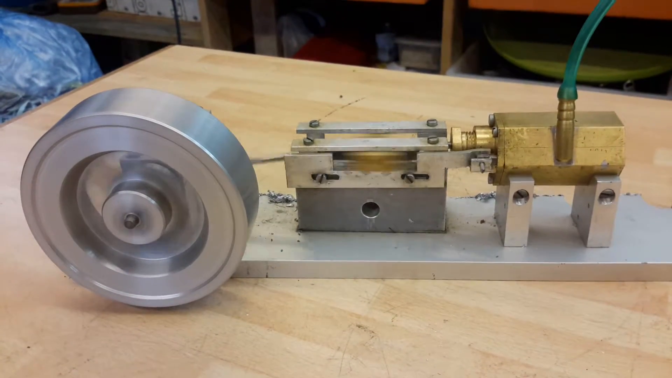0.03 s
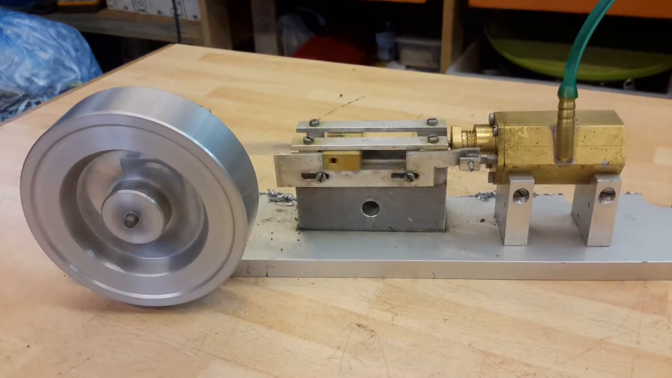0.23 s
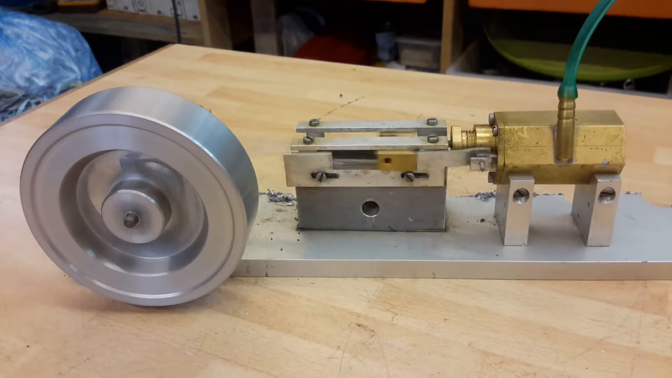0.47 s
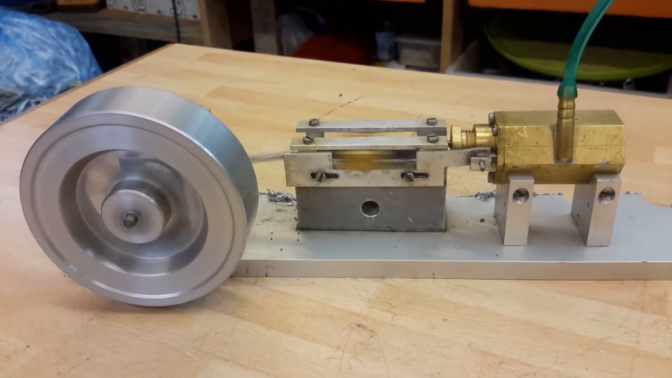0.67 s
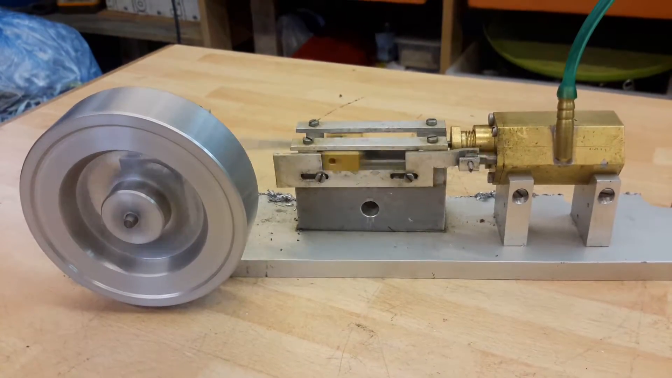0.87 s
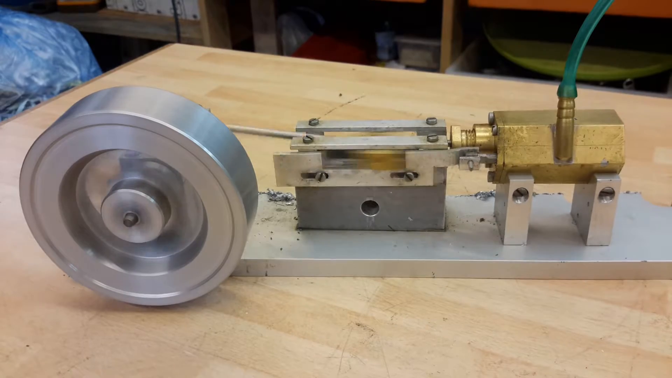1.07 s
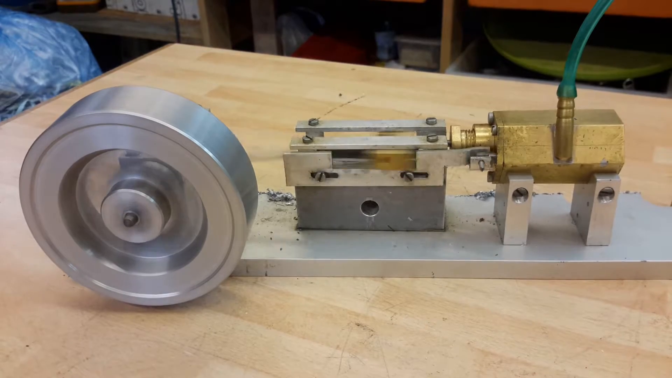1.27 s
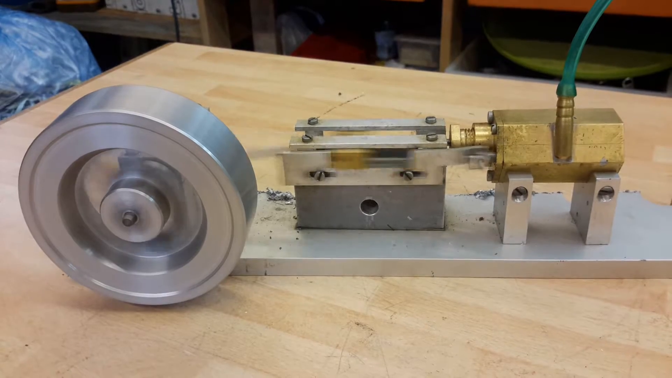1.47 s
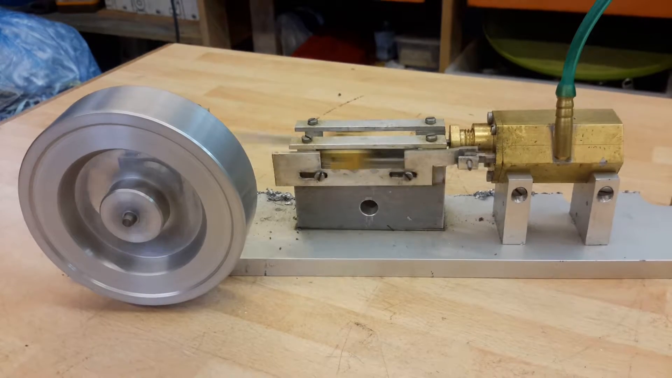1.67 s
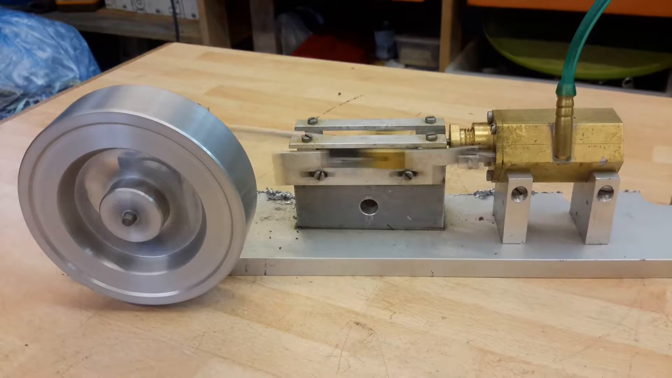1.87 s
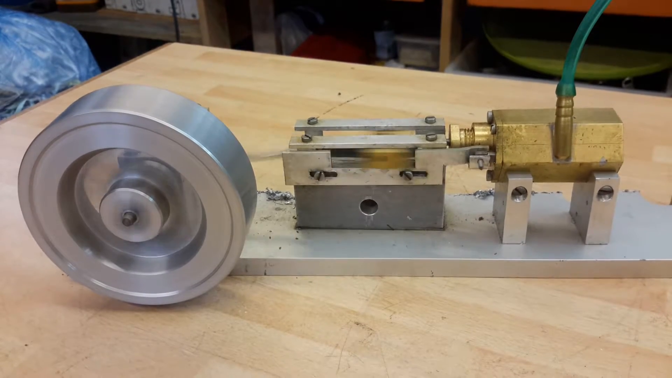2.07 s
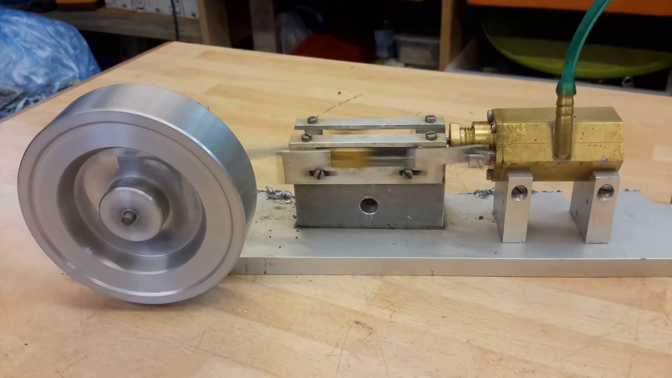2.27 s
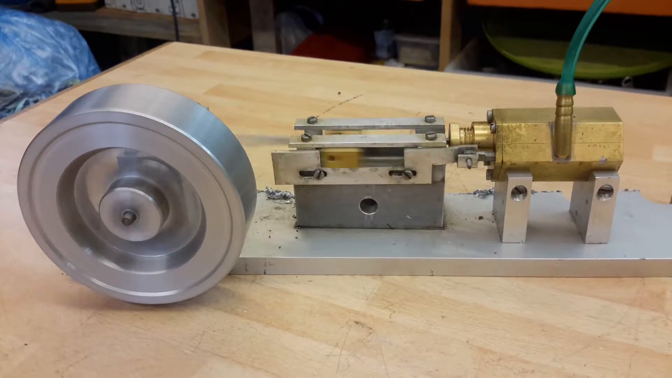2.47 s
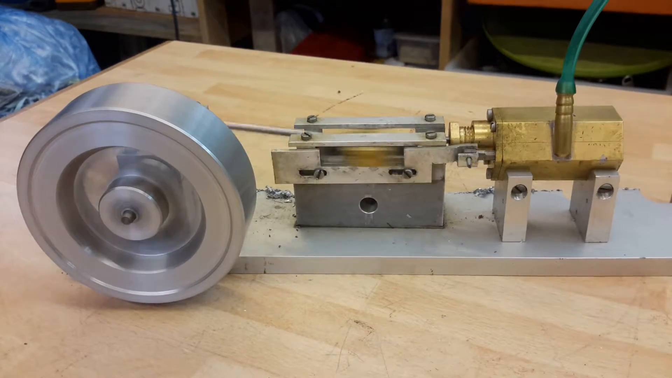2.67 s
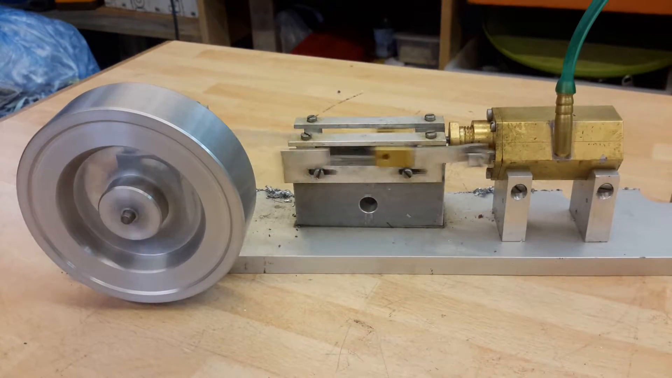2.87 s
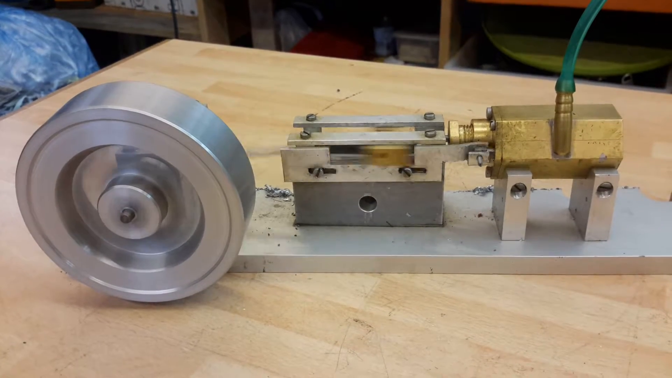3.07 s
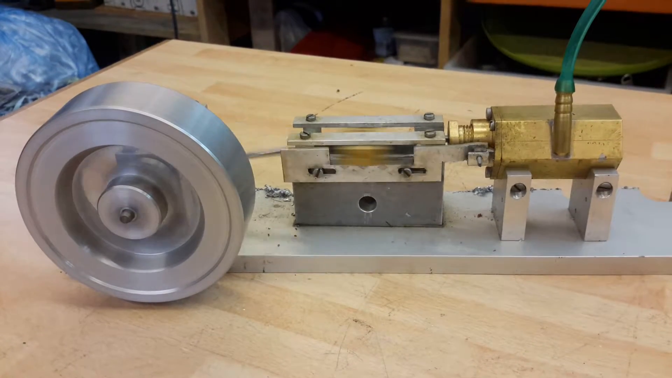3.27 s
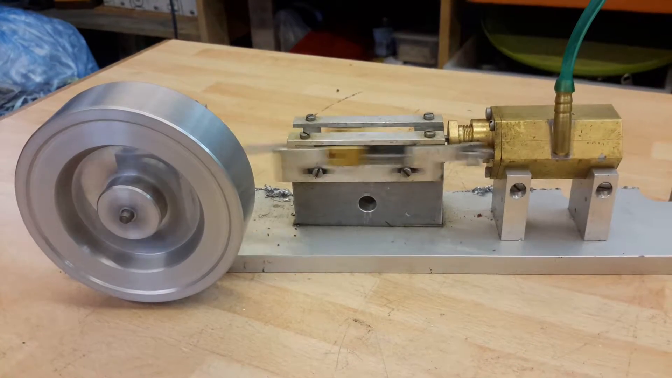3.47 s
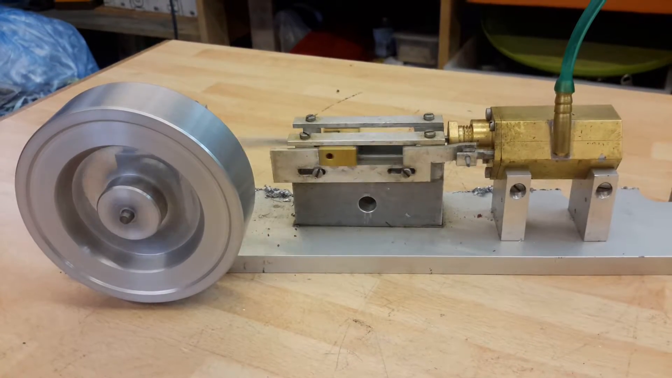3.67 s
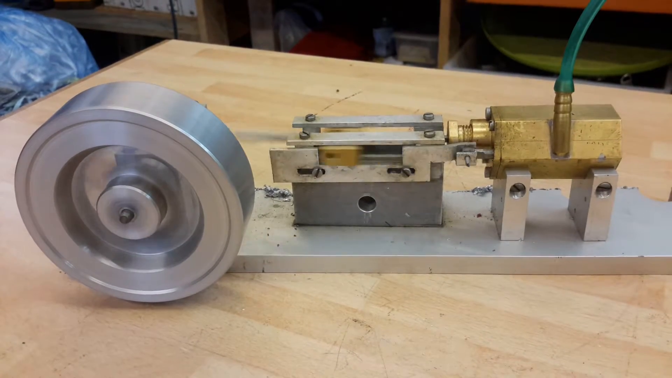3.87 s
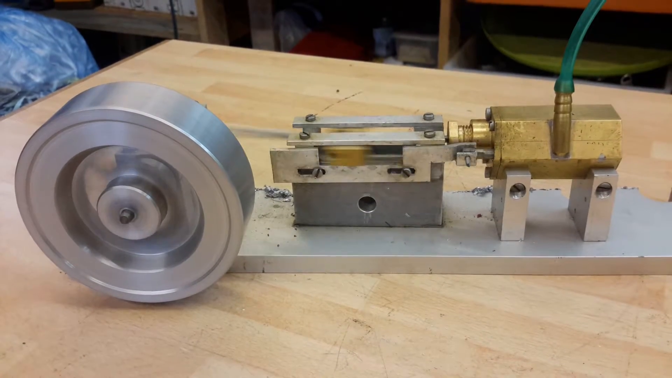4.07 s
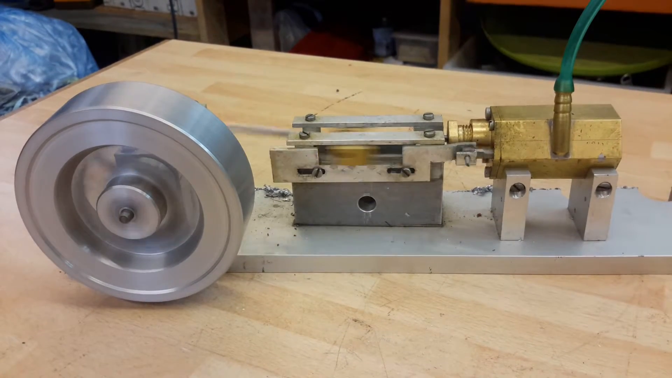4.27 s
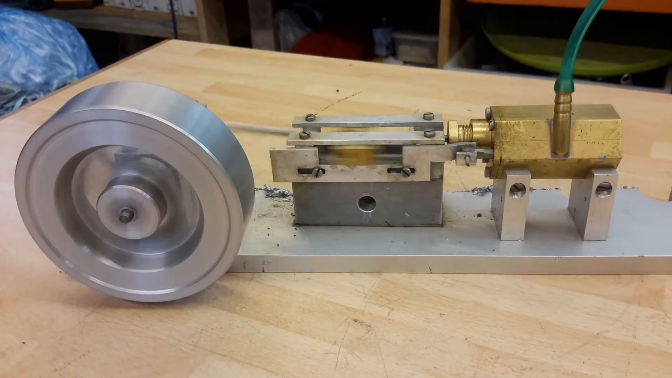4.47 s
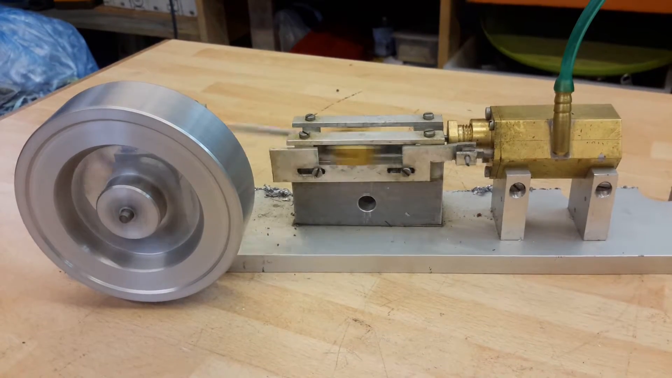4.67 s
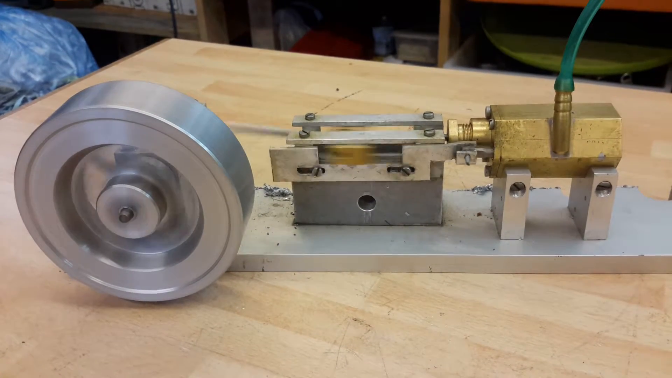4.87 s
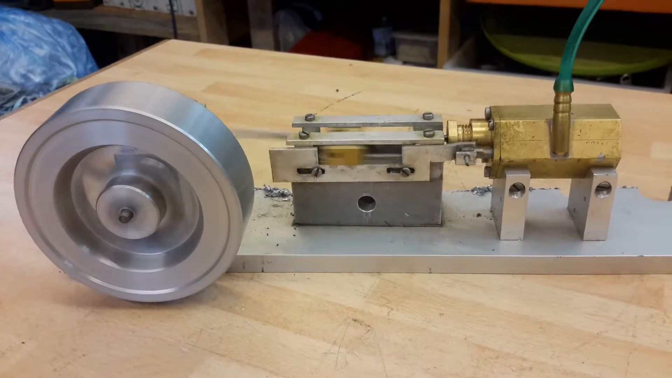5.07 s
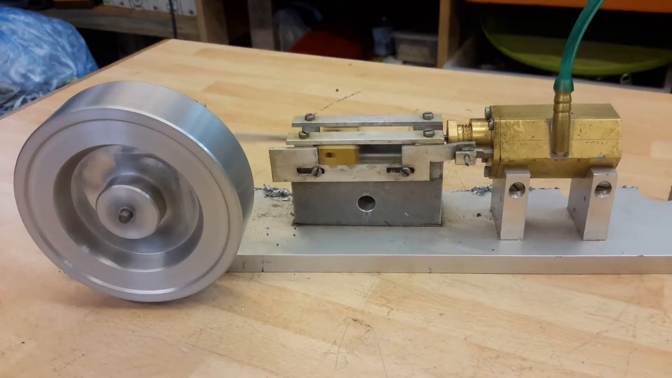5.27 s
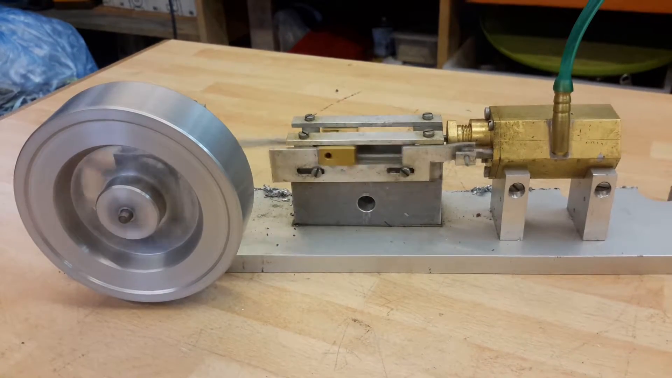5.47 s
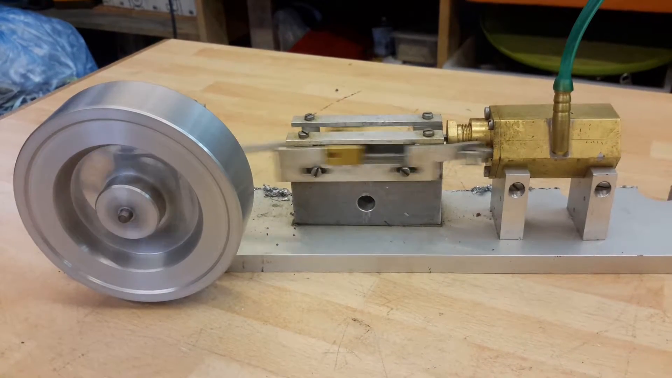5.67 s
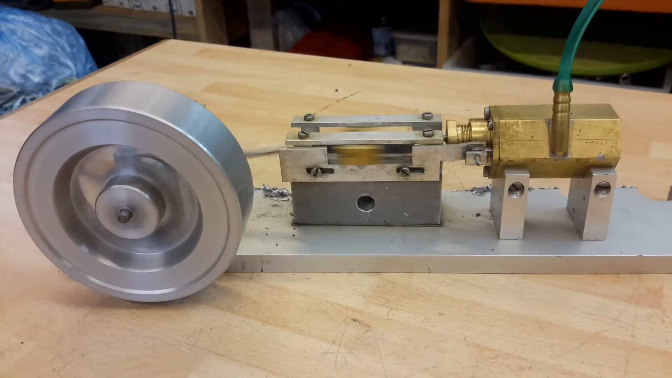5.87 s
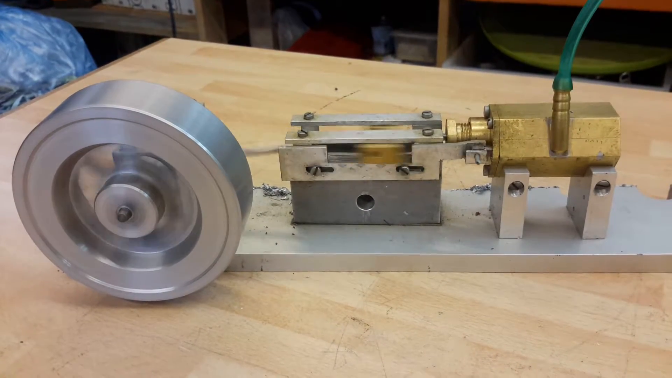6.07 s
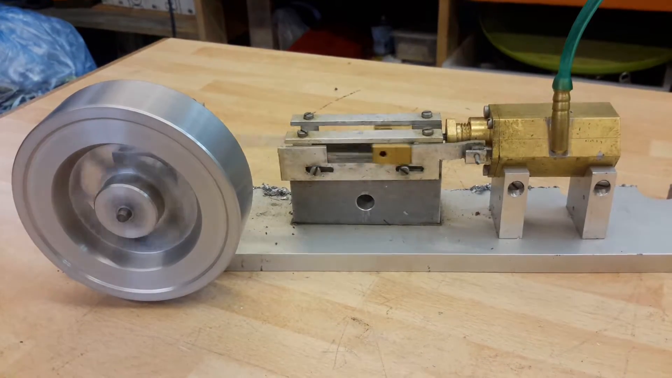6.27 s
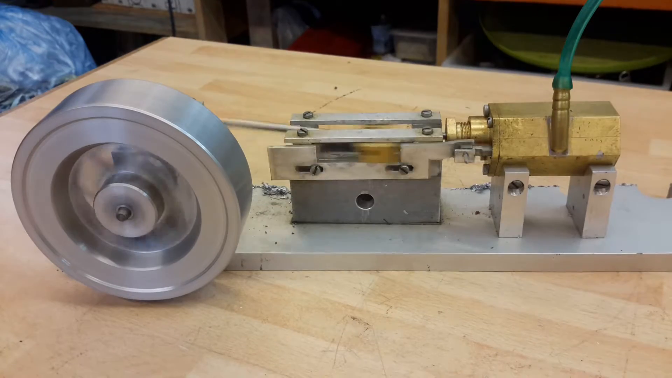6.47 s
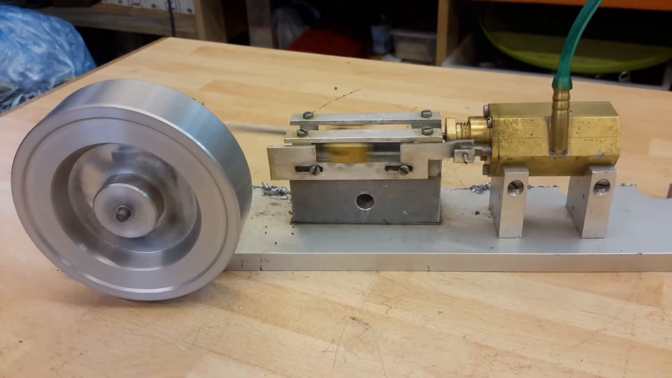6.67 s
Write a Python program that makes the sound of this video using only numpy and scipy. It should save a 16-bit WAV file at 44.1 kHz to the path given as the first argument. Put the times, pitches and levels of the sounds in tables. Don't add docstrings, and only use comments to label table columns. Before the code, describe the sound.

A small metal engine clatters rapidly on a wooden bench, bright double knocks with rattling rebounds over faint air hiss, steadily slowing and weakening.

```python
import sys
import numpy as np
from scipy import signal
from scipy.fft import rfft, irfft
from scipy.io import wavfile
from scipy.ndimage import uniform_filter1d

SR = 44100
rng = np.random.default_rng(int(sys.argv[2]) if len(sys.argv) > 2 else 0)


def gain_from_decibels(decibels):
    exponent = np.asarray(decibels, float) / 20
    return 10 ** exponent


def persist_wave(psi):
    counts = np.round(np.clip(psi, -1, 1) * 32767).astype(np.int16)
    wavfile.write(sys.argv[1], SR, np.atleast_2d(counts).T)


N = 296352

SKIP_S, SKIP_SAMPLES = 1.0912, 1024
LENGTH = N + SKIP_SAMPLES

# (time [s], level [dB])
PRESSURE = [
    (0, -1),
    (1.9, -0.77),
    (3.0, -1.9),
    (4.0, -2.5),
    (5.2, -3.5),
    (6.72, -5.5),
]
# (turn number [1], turn period [ms])
SPEED = [
    (0, 155.01),
    (6, 156.7),
    (12, 159.15),
    (18, 169.8),
    (24, 186.12),
    (30, 212.69),
    (36, 238.5),
]
# (time [s], frequency [Hz], level [dB])
HUM = [(0, 97.6, -51.5), (0.95, 100.4, -54.5), (1.65, 98.3, -53), (1.9, 93.4, -49.5), (3.2, 90.4, -53),
       (4.4, 89.1, -50.5), (6.72, 91.1, -59)]
# (time [s], level [dB], half length [s])
HUM_SWELLS = [(.6, -51.5, 0.087), (0.916, -46, .07), (1.263, -48.5, 0.089), (1.65, -51, 0.089),
              (1.99, -45, .08), (2.45, -56, 0.31), (3.552, -54, .25), (4.38, -60, 0.087)]
# (time [s], level [dB], half length [s])
RUMBLE_SWELLS = [
    (.92, -42, .09),
    (1.317, -39, 0.14),
    (1.652, -43, 0.24),
    (4.21, -53, 0.041),
]
# (frequency [Hz], density [dB per Hz])
LEAK_SPECTRUM = [(15, -77), (25, -26), (43, -56), (82, -16), (300, -6), (410, -8), (703, -15.5), (997, -25),
                 (1380, -18), (1710, -18.5), (2170, -20), (4500, -12), (9050, -31), (12800, -31.5),
                 (15500, -104)]
# (frequency [Hz], density [dB per Hz])
OUT_CLATTER = [(410, -24.5), (700, -6.5), (965, -22), (1360, -9.5), (1650, -11.5), (2520, -11),
               (2800, -17.5), (4730, 0), (6040, -13), (8210, -16.5), (12400, -37), (15000, -72)]
BACK_CLATTER = [(410, -37), (700, -1), (952, -7), (1650, -10.5), (1830, -1.5), (2400, -10.5), (2730, -6.5),
                (3300, -0.5), (4980, -2), (7040, -15), (9210, -25), (15000, -81)]
# (frequency [Hz], level [dB], decay time T60 [s])
FRAME_MODES = [(1430, -8.5, 0.057), (2322, -17.5, 0.16), (3040, -5.5, 0.015), (3870, -11, 0.051),
               (4210, -1.5, 0.011), (4250, -20, 0.033), (4530, 0.5, 0.013), (4710, -2.5, 0.024),
               (5050, -11, 0.048), (4990, -3.5, 0.076), (5310, -9.5, 0.089)]
# (frequency [Hz], level [dB], decay time T60 [s])
BOARD_MODES = [(249.4, -24, 0.14)]
# (frequency [Hz], level [dB], decay time T60 [s])
OUT_BENCH = [(165, -14.5, 0.067), (321, -1.5, 0.031), (412.6, 2.5, 0.06), (472, 0, 0.04),
             (528, -0.5, 0.044), (627, -0.5, 0.049), (629, -5.5, 0.11), (695, -10.5, 0.089)]
BACK_BENCH = [(161, -16.5, 0.088), (241, -10.5, 0.094), (350, -3.5, 0.036), (434.6, 4, 0.05),
              (493, -0.5, 0.033), (525.6, -1.5, 0.055), (650, -1.5, 0.044), (696, -7, 0.047)]
# (frequency [Hz], level [dB], decay time T60 [s])
PIN_MODES = [(1514, -7, 0.0072), (2670, -16, 0.0097), (5080, -0.5, 0.01), (6360, -10, 0.0026),
             (8200, -20, .005), (11160, -26, 0.0038), (12760, -22, 0.012), (14450, -24, 0.0034)]
# (frequency [Hz], level [dB], decay time T60 [s])
OUT_ROD = [(1445, 2, 0.026), (1680, 3, 0.0094), (2008, -2.5, 0.021), (2294, -7.5, 0.054),
           (2666, -6.5, 0.045)]
BACK_ROD = [(1454, 0, 0.0051), (1723, 1.5, 0.015), (1897, -8.5, 0.014)]
# (frequency [Hz], level [dB], decay time T60 [s])
OUT_BRASS = [(2866, -1.5, 0.0096), (3774, -8, 0.049), (4374, -2.5, 0.02), (4940, -1.5, 0.015),
             (6080, -2.5, 0.006), (7670, -17, 0.016), (8230, -11.5, 0.0035), (8950, -12, 0.0065)]
BACK_BRASS = [(2690, -5, 0.0022), (3136, -10.5, 0.043), (4056, -2, 0.013), (4510, -4, 0.013),
              (5060, -6, 0.014), (6130, -26, 0.0092), (7060, -19, 0.014), (8700, -13, 0.0043)]
# (time when fast [ms], time when slow [ms], level when fast [dB], level when slow [dB])
OUT_THUDS = [(0.503, 1, -0.5, -13), (6.93, 5.84, -8, -13), (14.8, 17.52, 2, 5), (22.27, 34, -7, -8.5),
             (29.5, 31, -6.5, 2), (36.31, 42, -3.5, -9), (49.44, 58, -4, -11)]
BACK_THUDS = [(4.85, 5.03, 6.5, -3), (10.28, 12.3, 5, 4.5), (16.22, 16.3, -8, -6), (20.7, 22, -0.5, 6),
              (30.02, 33, -3, -1), (35.5, 37, 2.5, -0.5), (46.35, 56, -19, -16), (56.7, 50, -25, -2.5)]
# (time when fast [ms], time when slow [ms], brass level [dB], rod level [dB], change when slow [dB])
OUT_BLOWS = [
    (0.095, 0.95, 1, -6, -6.5),
    (1.834, 2.47, -2.5, 4, -1),
    (7.01, 8.5, -13.5, -11.5, 5),
    (10.68, 11, -2.5, 4.5, -19),
    (12.325, 14.5, -7, -5, 4),
    (18, 19.5, -9.5, -34, -16),
    (22.5, 23.5, -24, -23, 20.5),
    (26.04, 29.5, -6, -25.5, -14),
    (35.3, 38, -21, -16, 5),
]
BACK_BLOWS = [
    (1.014, 0.694, 2, 2, -4.5),
    (5.28, 5.6, -15, -10.5, 5.5),
    (10.5, 11.6, -0.8, -22, 3),
    (10.96, 13, -8, 1.5, -3.5),
    (14.18, 24, -11, -4, 2.5),
    (18.76, 21, -16, -12, -1),
    (22.1, 22.5, -6, -12, -2),
    (28.74, 26, -4, -20, -15),
    (41, 52, -24, -12.5, -2),
    (45.7, 50, -28, -18, -3),
]
# (low edge [Hz], high edge [Hz], share kept [1])
PATCHES = [(9300, 9900, .75), (9900, 10600, .45), (10600, 11300, .4), (11300, 12100, .33),
           (12100, 13000, .35), (13000, 14000, .2), (14000, 15200, .1), (15200, 22050, .01)]

FAST_TURN_S, SLOW_TURN_S = .155, .235
FIRST_OUT_S, BACK_SHARE = .08846, .5153
# (knock [dB], share, bench [dB], share)
OUT_FORCE, BACK_FORCE = (-8.5, 1.27, -29, .5), (-10.5, 0.99, -32, 0.9)
KNOCK_SCATTER_DB, BENCH_SCATTER_DB = 0, 0.32
# (brass [dB], rod [dB], clatter [dB], its fade [ms], frame [dB], its fade [ms], clatter swells at [ms])
OUT_MIX = (-7, -18.5, 1.5, 24, -24.5, 24.5, 11.5)
BACK_MIX = (-8, -12.5, 0.5, 19, -30.5, 41, 7.5)
# (time [ms], level when fast [dB], change when slow [dB])
OUT_PIN, BACK_PIN = (1.75, -5.5, -2.7), (0.48, -12.5, -1.6)
CANCEL_TURN_S, CANCEL_WIDTH_S, CANCEL_DB = 0.178, 0.019, -1.5
LEAK_DB, LEAK_SHARE = -34, 1
WHIRR_DB, WHIRR_SHARE = -43, 5.8
RUMBLE_DB = -48
ROOM_T60_S, ROOM_DB, SIDE_DB = .17, -11, -19


def heard(t):
    return t - (t > SKIP_S) * SKIP_SAMPLES / SR


def pressure_db(t):
    return np.interp(heard(t), *np.transpose(PRESSURE))


def swells(t, steady_db, rows):
    return gain_from_decibels(steady_db) + sum(gain_from_decibels(db) * np.exp(-((t - s) / half_s) ** 2) for s, db, half_s in rows)


def colour(x, points):
    hz, db = np.transpose(points)
    grid = np.maximum(np.fft.rfftfreq(4096, 1 / SR), 1)
    gain_db = np.interp(np.log(grid), np.log(hz), db)
    cepstrum = irfft(np.log(gain_from_decibels(gain_db)))
    cepstrum[1:2048] *= 2
    cepstrum[2049:] = 0
    response = irfft(np.exp(rfft(cepstrum)))
    response /= np.sqrt(np.sum(response ** 2))
    return signal.oaconvolve(x, response)[:len(x)]


def ring(x, modes):
    out = 0
    for k, (hz, db, t60) in enumerate(modes):
        pole = np.exp(2j * np.pi * hz / SR - np.log(1000) / (t60 * SR))
        mode = signal.lfilter([0, pole.imag], [1, -2 * pole.real, abs(pole) ** 2], x)
        out = out + (-1) ** k * gain_from_decibels(db) * mode
    return out


def noise():
    return rng.standard_normal(LENGTH)


def narrow(hz, width_hz):
    x = ring(noise(), [(hz, 0, np.log(1000) / np.pi / width_hz)])
    return x / x.std()


def train(seconds, sizes):
    place = np.clip(seconds.ravel() * SR, 0, LENGTH - 2)
    whole = place.astype(int)
    part = place - whole
    early = np.bincount(whole, sizes.ravel() * (1 - part), LENGTH)
    return early + np.bincount(whole + 1, sizes.ravel() * part, LENGTH)


def drift(turns, count, memory):
    steps = rng.standard_normal((turns + 30, count))
    return signal.lfilter([np.sqrt(1 - memory ** 2)], [1, -memory], steps, axis=0)[30:]


def soften(x, hz, order):
    return signal.sosfilt(signal.butter(order, hz, fs=SR, output="sos"), x)


def high_pass(x, hz, order):
    return signal.sosfilt(signal.butter(order, hz, "high", fs=SR, output="sos"), x)


def workshop_rumble(t):
    return swells(heard(t), RUMBLE_DB, RUMBLE_SWELLS) * gain_from_decibels(-9) * narrow(114.0, 22.0)


def supply_hum(t):
    s, *columns = np.transpose(HUM)
    hum_hz, hum_db = (np.interp(heard(t), s, c) for c in columns)
    phase = 2 * np.pi * np.cumsum(hum_hz + 1.41 * narrow(1, 5.3)) / SR
    return swells(heard(t), hum_db + 0.23, HUM_SWELLS) * np.sqrt(2) * np.sin(phase)


def room(x):
    t = np.arange(int(.5 * SR)) / SR
    decay = np.exp(-np.log(1000) * t / ROOM_T60_S)
    tail = rng.standard_normal(len(t)) * decay * (1 - np.exp(-t / 0.0017))
    tail = colour(tail, [(100, -11), (1000, -9.0), (5000, -9.0), (12000, 18.5)])
    return signal.fftconvolve(x, tail / np.sqrt(np.sum(tail ** 2)))[:LENGTH]


def air_hiss(t, turn_s):
    turns = np.interp(t, turn_s, np.arange(len(turn_s)), left=-.3)
    valve = np.exp(3.7 * (np.cos(2 * np.pi * (turns - .03)) - 1))
    jet = colour(noise(), [(3000, -55), (6000, -3), (8000, 16.5), (10000, -17),
                           (12500, -1.5), (14500, -20), (16000, -11)])
    flutter_db = 0.78 * narrow(1, 57.0)
    leak = gain_from_decibels(flutter_db - 1.5) * colour(noise(), LEAK_SPECTRUM)
    return gain_from_decibels(LEAK_DB + LEAK_SHARE * pressure_db(t)) * (leak + gain_from_decibels(-9.0) * valve * jet)


def bed_plate_whirr(t):
    whirr = colour(noise(), [(300, -29), (620, 4.5), (1000, -2.5), (1450, -4), (2600, -25.5)])
    return gain_from_decibels(WHIRR_DB + WHIRR_SHARE * pressure_db(t)) * whirr


def stray_part():
    click = train(np.array([5.031 + SKIP_SAMPLES / SR]), gain_from_decibels(np.array([-35])))
    return ring(click, [(820, -2, .03), (1080, 0, .022), (1380, -1, .014)])


def bench_top_swing(rows, slow):
    return ring(train(rows[:, 0] + 0.00647, gain_from_decibels(rows[:, 2] + 29 - 5.0 * slow[:, 0])), BOARD_MODES)


def bench_thuds(rows, slow, thuds, bench):
    s, bench_db = rows[:, :1], rows[:, 2:]
    fast_ms, slow_ms, fast_db, slow_db = np.transpose(thuds)
    when = s + (fast_ms + slow * (slow_ms - fast_ms)) / 1000
    thud_db = bench_db + 2 + fast_db + slow * (slow_db - fast_db)
    thud_db = thud_db + 2.4 * drift(len(s), len(thuds), 0.99)
    return soften(ring(train(when, gain_from_decibels(thud_db)), bench), 920.0, order=4)


def loose_clatter(rows, slow, spectrum, mix, count=500):
    s, knock_db = rows[:, :1], rows[:, 1:2]
    _, _, clatter_db, clatter_fade_ms, frame_db, frame_fade_ms, swell_ms = mix
    after_ms = 2.8 + 70 * rng.random(count)
    swell = 0.22 + 0.67 / (1 + np.exp((swell_ms - after_ms) / 2.7))
    pattern = 0.76 * drift(len(s), count, 0.94) + .5 * rng.standard_normal((len(s), count))
    size = gain_from_decibels(knock_db) * swell * pattern
    when = s + after_ms * (1 + .08 * slow) / 1000
    chatter = train(when, gain_from_decibels(clatter_db) * size * np.exp(-after_ms / clatter_fade_ms))
    frame = train(when, gain_from_decibels(frame_db) * size * np.exp(-after_ms / frame_fade_ms))
    return colour(chatter, spectrum) + ring(frame, FRAME_MODES)


def pin_contact(rows, slow, contact):
    ms, db, slow_db = contact
    return ring(train(rows[:, 0] + ms / 1000, gain_from_decibels(rows[:, 1] + db + slow_db * slow[:, 0])), PIN_MODES)


def metal_blows(rows, slow, blows, brass, rod, mix):
    s, knock_db = rows[:, :1], rows[:, 1:2]
    fast_ms, slow_ms, brass_db, rod_db, slow_db = np.transpose(blows)
    when = s + (fast_ms + slow * (slow_ms - fast_ms) - .5) / 1000
    when += fast_ms * 4e-6 * rng.standard_normal(when.shape)
    blow_db = knock_db + slow * slow_db + 0.5 * drift(len(s), len(blows), 0.24)
    sound = ring(train(when, gain_from_decibels(blow_db + mix[0] + brass_db)), brass)
    sound += ring(train(when, gain_from_decibels(blow_db + mix[1] + 4.66 * slow + rod_db)), rod)
    return soften(sound, 10500.0, order=2)


def strokes(s, force):
    chance = rng.standard_normal((len(s), 2))
    knock_db = force[0] + force[1] * pressure_db(s) + KNOCK_SCATTER_DB * chance[:, 0]
    bench_db = force[2] + force[3] * pressure_db(s) + BENCH_SCATTER_DB * chance[:, 1]
    return np.c_[s, knock_db, bench_db]


def engine_sound(out_s, turn):
    slow = np.clip((turn - FAST_TURN_S) / (SLOW_TURN_S - FAST_TURN_S), 0, 1)[:, None]
    out_slow = slow[1:]
    out = strokes(out_s[1:], OUT_FORCE)
    back = strokes(out_s + BACK_SHARE * turn, BACK_FORCE)
    out[:, 2] += CANCEL_DB * np.exp(-((turn[1:] - CANCEL_TURN_S) / CANCEL_WIDTH_S) ** 2)
    sound = stray_part() + bench_top_swing(out, out_slow)
    sound += bench_thuds(out, out_slow, OUT_THUDS, OUT_BENCH)
    sound += bench_thuds(back, slow, BACK_THUDS, BACK_BENCH)
    sound += loose_clatter(out, out_slow, OUT_CLATTER, OUT_MIX)
    sound += loose_clatter(back, slow, BACK_CLATTER, BACK_MIX)
    sound += pin_contact(out, out_slow, OUT_PIN) + pin_contact(back, slow, BACK_PIN)
    sound += metal_blows(out, out_slow, OUT_BLOWS, OUT_BRASS, OUT_ROD, OUT_MIX)
    sound += metal_blows(back, slow, BACK_BLOWS, BACK_BRASS, BACK_ROD, BACK_MIX)
    return high_pass(sound, 105.0, order=3)


def scene():
    t = np.arange(LENGTH) / SR
    number, ms = np.transpose(SPEED)
    turn = np.interp(np.arange(-1, number[-1] + 1), number, ms) / 1000
    out_s = FIRST_OUT_S + np.cumsum(turn) - turn - turn[0]
    turn_s = np.append(out_s[1:], out_s[-1] + turn[-1])
    background = workshop_rumble(t) + supply_hum(t) + air_hiss(t, turn_s) + bed_plate_whirr(t)
    engine = engine_sound(out_s, turn)
    mid = background + engine + gain_from_decibels(ROOM_DB) * room(engine)
    side = gain_from_decibels(SIDE_DB) * room(mid)
    start = int(SKIP_S * SR)
    return np.delete(np.array([mid + side, mid - side]), np.s_[start:start + SKIP_SAMPLES], axis=1)


def patchy_treble(x, size=1024, chance_db=4.0):
    spectrum, hz = rfft(x), np.fft.rfftfreq(N, 1 / SR)
    out = x.copy()
    for low, high, share in PATCHES:
        band = irfft(spectrum * ((hz >= low) & (hz < high)), N)
        level_db = 10 * np.log10(uniform_filter1d(band[0] ** 2, size // 4) + 1e-14)
        level_db -= uniform_filter1d(level_db, SR)
        chance = np.repeat(rng.standard_normal(N // size + 1), size)[:N]
        level_db = level_db + chance_db * chance
        is_open = 1. * (level_db > np.quantile(level_db, 1 - share))
        keep = uniform_filter1d(is_open, size // 8)
        out += band * (keep * gain_from_decibels(4.0) - 1)
    return out


def low_pass(x):
    return signal.sosfilt(signal.butter(12, 15400, fs=SR, output="sos"), x)


def record(dry):
    mix = patchy_treble(high_pass(dry, 70, order=1))
    return low_pass(mix)


dry = scene()
out = record(dry)
persist_wave(out)
```